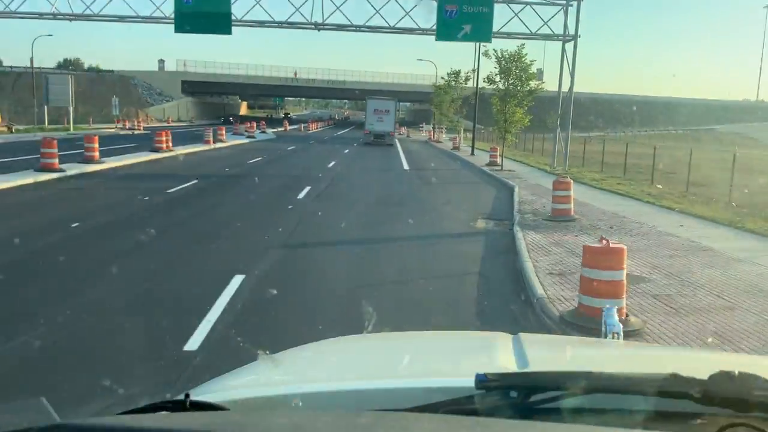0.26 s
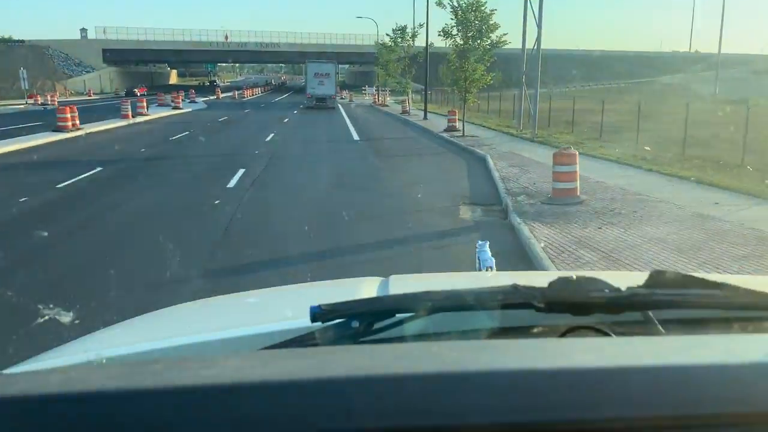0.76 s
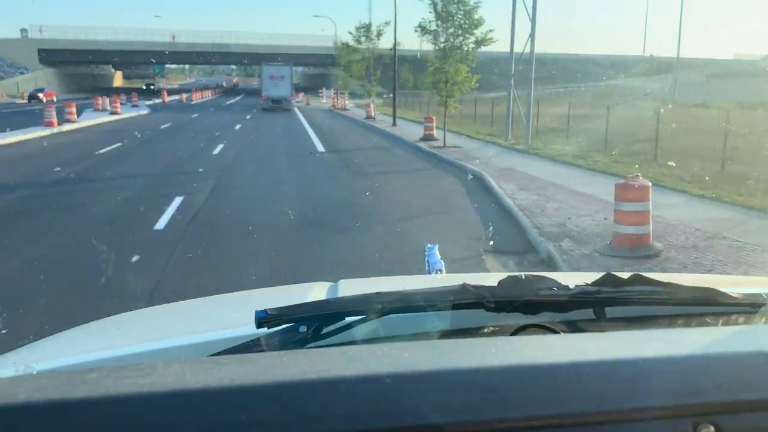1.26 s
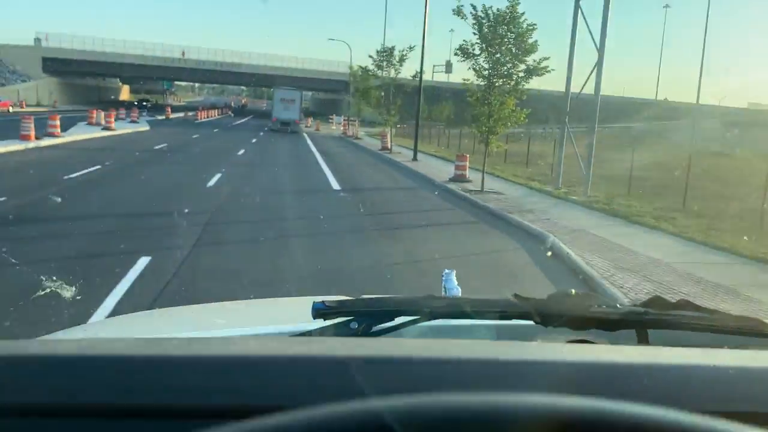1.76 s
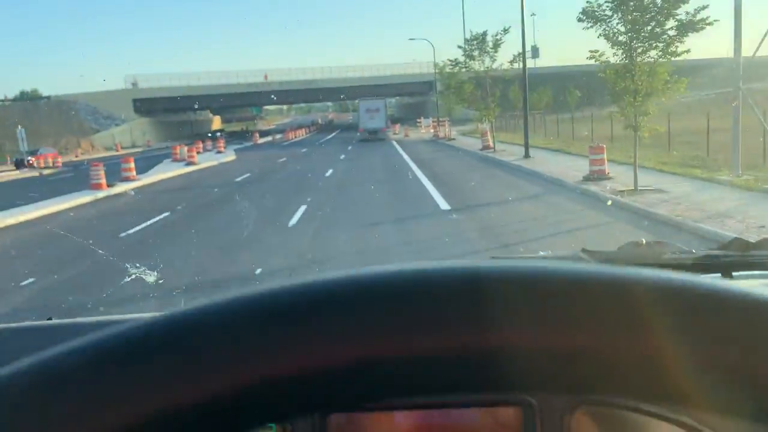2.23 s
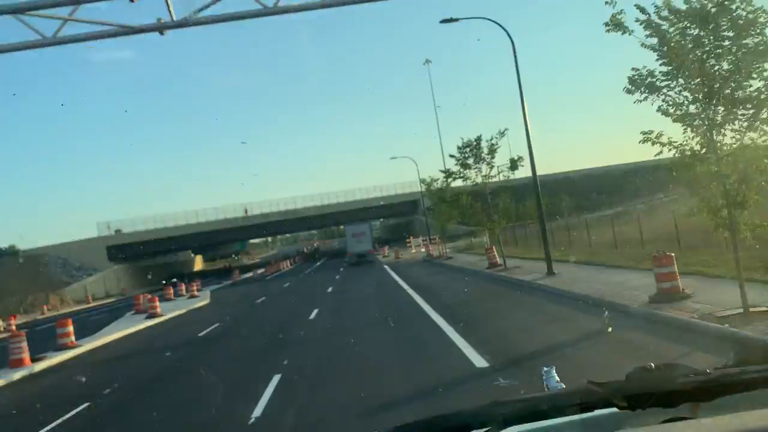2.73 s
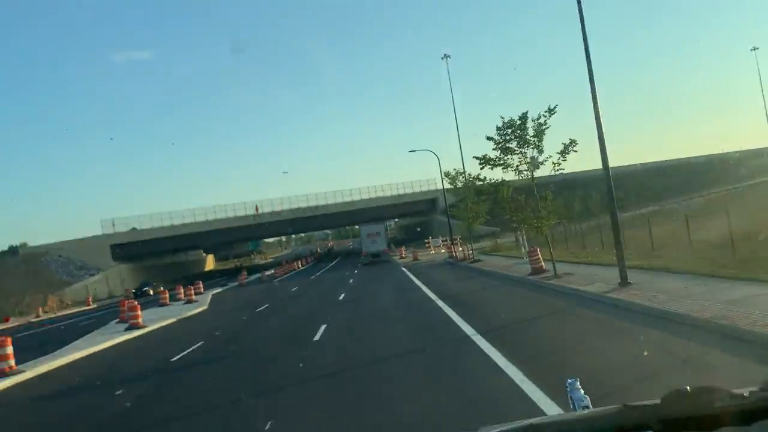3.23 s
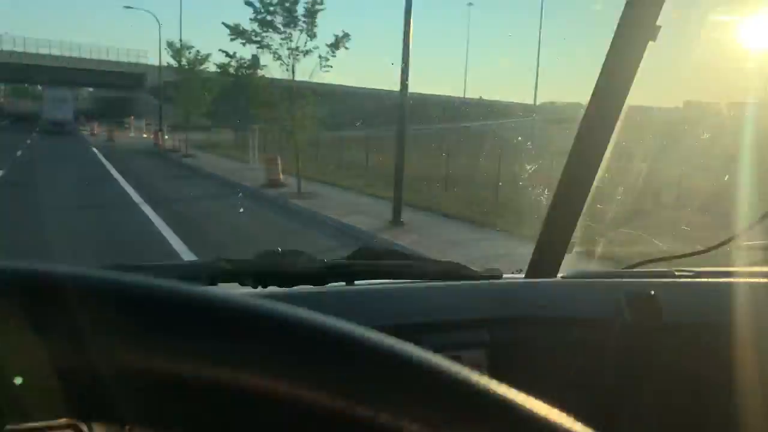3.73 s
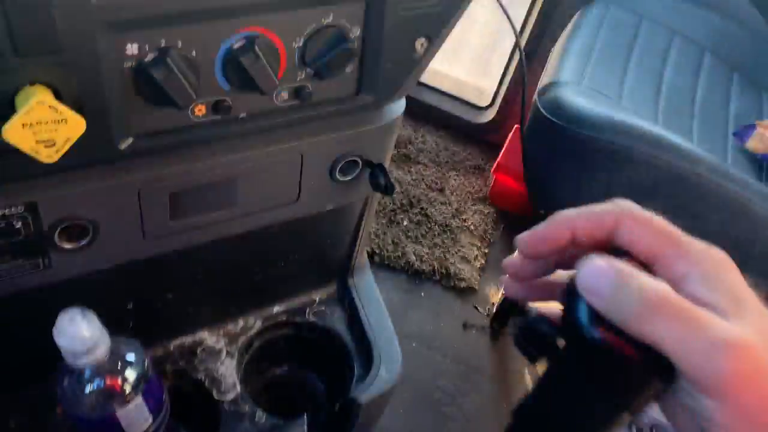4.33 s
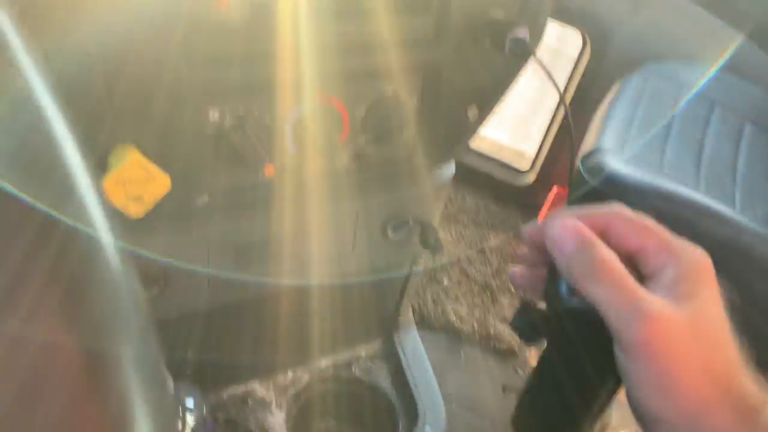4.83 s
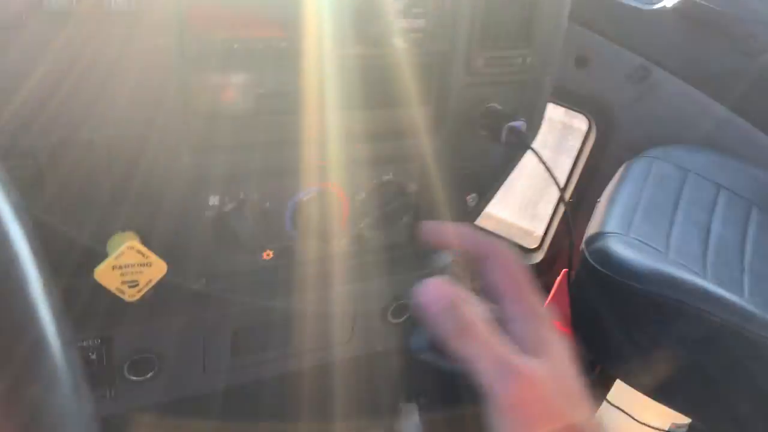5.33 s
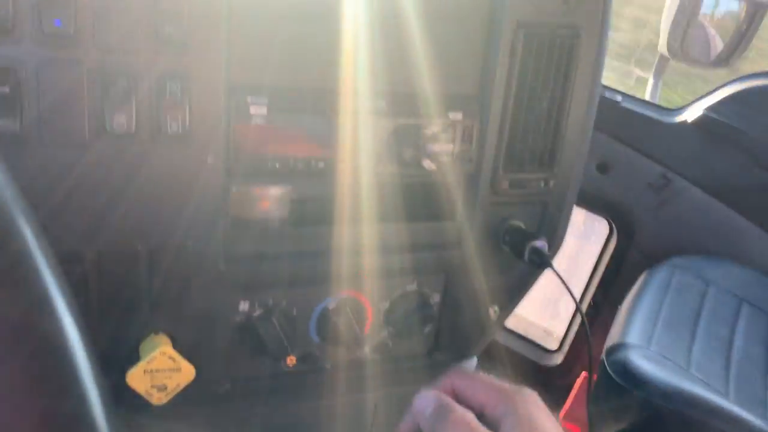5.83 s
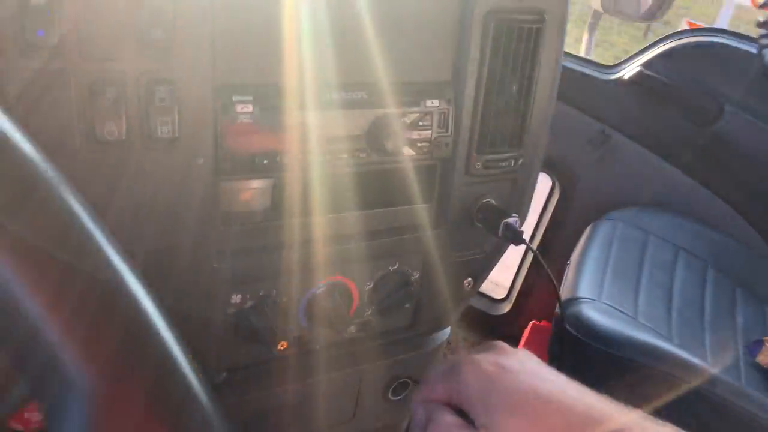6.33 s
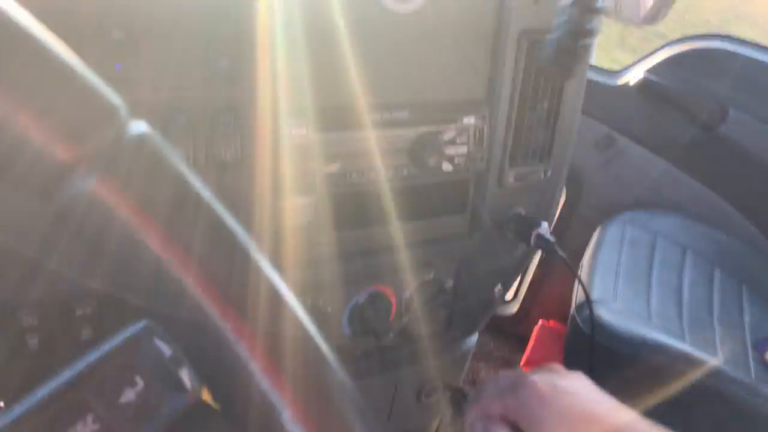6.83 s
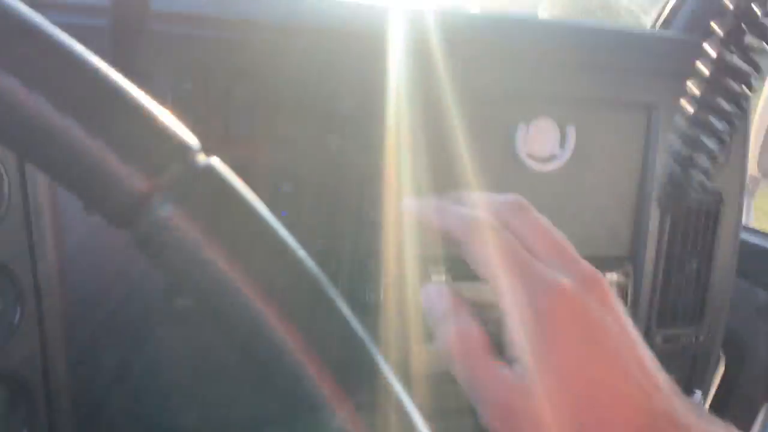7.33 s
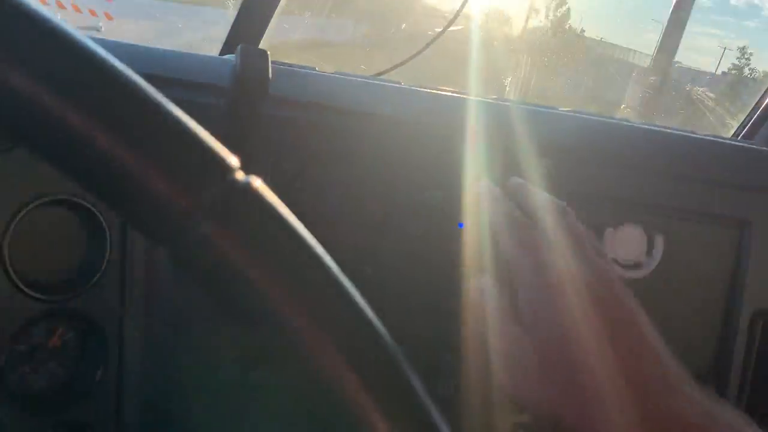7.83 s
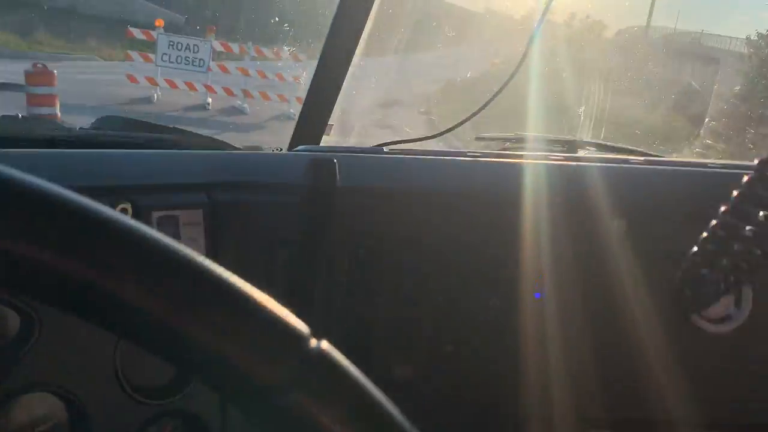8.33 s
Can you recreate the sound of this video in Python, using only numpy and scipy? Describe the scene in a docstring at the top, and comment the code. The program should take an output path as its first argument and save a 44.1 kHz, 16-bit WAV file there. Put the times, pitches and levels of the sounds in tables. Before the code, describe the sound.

A heavy diesel growls upward under load, sags at a shift and settles, amid cab roar, relay ticks, jingling keys and lever clicks.

```python
"""Diesel truck cab through a gear change

A six-cylinder engine, a sum of sine orders, pulls up through its revs, drops for a gear change and
cruises on amid roar of filtered noise and a buzzing panel. At first an indicator relay ticks: noisy
contacts ring its housing. Keys ring as metal modes, switches and trim click as noise bursts, the turbo
whistles as a gliding sine under load, and a faint squeak is a brief rough sine. Halfway the hand-held
microphone swings from the windscreen down to the gear lever."""
import sys
import numpy as np
from scipy import signal
from scipy.fft import rfft, irfft, next_fast_len
from scipy.io import wavfile

SR = 44100
rng = np.random.default_rng(int(sys.argv[2]) if len(sys.argv) > 2 else 0)


def to_wav(s):
    """Save 16-bit WAV."""
    ch = np.atleast_2d(s).T  # columns
    pcm = np.round(np.clip(ch, -1, 1) * 32767)  # PCM
    wavfile.write(sys.argv[1], SR, pcm.astype(np.int16))


N = 377936  # length in samples


def from_db(db):
    """Logarithmic level: 20 dB is a tenfold amplitude."""
    return 10 ** (np.asarray(db) / 20)


def rms_one(x):
    """Normalisation to unit root mean square."""
    return x / np.sqrt(np.mean(x ** 2) + 1e-20)


def in_time(rows, step=1):
    """Linear interpolation of a table's columns at every step-th sample."""
    times_s, *columns = np.transpose(rows)
    return [np.interp(np.arange(0, N, step) / SR, times_s, column) for column in columns]


def at_hz(points, hz):
    """Spectral envelope: linear interpolation on a logarithmic frequency axis."""
    point_hz, values = np.transpose(points)
    return np.interp(np.log(np.maximum(hz, 1)), np.log(point_hz), values)


def drift(rate_hz, step=1):
    """Slow random modulation of rms 1: Gaussian points joined by straight lines."""
    s = np.arange(0, N, step) / SR
    size = int(N / SR * rate_hz) + 2
    # joining by lines lowers the variance to two thirds
    return np.interp(s * rate_hz, np.arange(size), rng.standard_normal(size)) * np.sqrt(1.5)


def ring(excitation, hz, t60):
    """Damped resonator: a unit impulse sets off a decaying sine of initial height 1."""
    radius, angle = from_db(-60 / (t60 * SR)), 2 * np.pi * hz / SR
    feedback = [1, -2 * radius * np.cos(angle), radius * radius]
    return signal.lfilter([0, np.sin(angle)], feedback, excitation + 1e-18)


def chatter(times_s, gains, length_s):
    """Contact noise: at each time a short scrabble swells fast and dies."""
    size = round(length_s * SR)
    u = np.arange(size) / size
    shape = rms_one(u * (1 - u) ** 2) / np.sqrt(size)  # unit energy
    out = np.zeros(N + size)
    for at_s, gain in zip(times_s, gains):
        out[int(at_s * SR):][:size] += gain * shape * rng.standard_normal(size)
    return out[:N]


def turned(step=1):
    """Receiver orientation: 0 facing the windscreen, 1 once the microphone faces the floor."""
    middle_s, length_s = 3.81, 0.37
    return np.clip((np.arange(0, N, step) / SR - middle_s) / length_s + .5, 0, 1)


def engine():
    """Harmonic synthesis: sines at orders of the four-stroke cycle; cab resonances lift the lesser ones."""
    # crankshaft motion: t/s, four-stroke cycle rate f/Hz
    speed = [(0.0, 10.3), (0.22, 10.5), (1.12, 11.55), (1.72, 12.3), (2.02, 13.06), (2.32, 13.53),
             (2.62, 14.28), (3.22, 15.26), (3.82, 16.25), (4.42, 16.82), (4.6, 16.8), (4.9, 15.62),
             (5.2, 13.74), (5.5, 12.58), (5.8, 12.3), (6.1, 12.72), (6.81, 12.66), (7.11, 12.85),
             (8.01, 12.39), (8.57, 11.98)]
    # drive: t/s, firing tone level/dB, load level/dB for the orders without a curve of their own
    drive = [(0.05, -26, -21.5), (.6, -38, -19.5), (1.0, -25.5, -18.5), (1.4, -20.5, -16.5),
             (1.8, -13.5, -26), (2.15, -17.5, -13), (2.4, -31, -14.5), (2.6, -18.5, -15), (3.0, -20, -12.5),
             (3.25, -25, -14.5), (3.6, -14.5, -16), (4.2, -17.5, -14.5), (4.5, -20, -14.5),
             (5.35, -16.5, -20.5), (5.6, -37, -20), (6.0, -25.5, -20), (6.25, -21.5, -19.5),
             (6.6, -19.5, -19), (7.0, -23, -20), (7.2, -20.5, -21.5), (7.5, -28, -19), (8.2, -21, -24),
             (8.55, -24, -22.5)]
    # combustion knock, lifting orders above 20 without a curve of their own: t/s, level/dB
    knock = [(0, 3), (.4, 7.5), (1.4, 0), (2.5, 1), (3.0, 0.5), (3.8, 1), (4.4, -14), (4.9, 1), (5.9, 0.5),
             (6.45, 0.5), (7.0, -2), (7.4, -4), (8.57, -7)]
    # strong low orders beside the firing tone: order numbers; then t/s, level/dB of each
    low_orders = [5, 7.5, 9, 12]
    low_levels = [(0, -33, -29, -24, -24.5), (.5, -29.5, -24.5, -26.5, -29), (1, -27, -24.5, -27, -40),
                  (1.5, -23, -41, -22.5, -38), (2, -38, -38, -28.5, -25), (2.4, -30, -42, -22.5, -20),
                  (2.8, -23, -40, -20.5, -30), (3.2, -24, -42, -31, -28.5), (3.6, -18.5, -31, -27, -35),
                  (4, -26, -35, -24, -23.5), (4.4, -17, -47, -38, -22.5), (4.7, -24, -40, -47, -28),
                  (5.1, -32, -43, -44, -38), (5.6, -32, -47, -36, -40), (6, -28.5, -39, -48, -46),
                  (6.5, -27, -25, -27.5, -32), (7, -35, -34, -48, -34), (7.5, -25, -35, -34, -40),
                  (8.57, -26, -42, -32.5, -55)]
    # orders that swell at the top of the pull: order numbers; then t/s, level/dB of each
    pull_orders = [14, 15]
    pull_levels = [(0, -37, -43), (1, -35.5, -36), (2.1, -39, -30.5), (2.8, -30, -37), (3.6, -41, -42),
                   (4.0, -30.5, -31), (4.4, -21.5, -26.5), (4.75, -28, -29), (5, -43, -41), (6.5, -44, -41),
                   (8.57, -42, -47)]
    # whining orders that come and go: order numbers; then t/s, level/dB of each
    high_orders = [24, 28, 30, 36, 42, 48]
    high_levels = [(0, -62, -55, -59, -63, -40.5, -65), (0.3, -55, -61, -61, -52, -31, -36),
                   (0.7, -60, -53, -52, -42, -34.5, -43), (1, -41, -61, -63, -59, -37, -46),
                   (1.4, -44, -56, -54, -52, -44, -60), (1.699, -63, -58, -61, -39, -36.5, -53),
                   (2, -62, -47, -38, -32.5, -38, -46), (2.3, -50, -45, -56, -59, -57, -52),
                   (2.6, -52, -51, -41, -38, -62, -57), (3, -46, -56, -41, -57, -61, -63),
                   (3.4, -46, -43, -29.5, -38, -56, -53), (3.7, -33, -33, -38, -48, -52, -39.5),
                   (4, -46, -38.5, -49, -56, -64, -55), (4.3, -46, -35, -56, -56, -59, -70),
                   (4.6, -49, -62, -54, -43, -64, -56), (5, -58, -67, -59, -62, -69, -70),
                   (5.5, -58, -50, -41, -56, -58, -56), (6, -43, -43, -44.5, -53, -52, -64),
                   (6.5, -48, -49, -33.5, -46, -42, -49), (6.9, -64, -47, -47, -58, -41, -64),
                   (7.5, -50.5, -58, -49, -48, -59, -64), (8.5, -49, -61, -54, -56, -49, -61)]
    # unevenness between the cylinders: level/dB of orders 2, 3, 4 .. 50, unused where a curve exists
    unevenness = [-10.5, -3, -28, 0, 0, -3, 1, 0, 5.5, 2, 0, 5.5, 9, 6.5, -6.5, 7, 9, -0.5, 3.5, 1.5, -17,
                  -5, 4.5, -20, -3.5, -13.5, 1.5, -8, 3.5, -1.5, -23, -7.5, -10.5, -6.5, 3.5, -9, -19, 0.5,
                  -12, -4.5, 7.5, -8.5, -2, -10.5, -13, -13, 7.5, -2.5, -4.5]
    # cab air and panel resonances: f/Hz, width/Hz, level/dB facing windscreen, level/dB facing floor
    resonances = [(84.2, 77.5, 3, 4), (125.8, 13, 5.5, -10), (163.5, 18, 7, -4.5), (201.6, 20.4, 7.5, 4),
                  (242.5, 27.7, 0.5, 9.5), (283.6, 26.4, -7.5, 4.5), (389.6, 43, 3, 11.5),
                  (449.7, 43, 12, 5), (529, 58, 9.5, 11.5), (633, 29, 14, -0.5)]
    # the engine leans left as the microphone sways: t/s, left over right level/dB
    sway = [(0.0, 1), (2.0, 4.5), (4.72, -0.5), (4.89, 3), (5.01, 1.0), (6.73, 3.0), (7.76, 1.5), (8.31, 7),
            (8.57, 3)]
    cylinders, top_order = 6, 50  # the firing tone is the order equal to the number of cylinders
    tilt_db_per_octave = -7
    order_waver_db, tone_waver_db = 3.2, 1.0
    step = 8  # low tones are computed at an eighth of the rate

    cycle_hz, = in_time(speed, step)
    firing_db, load_db = in_time(drive, step)
    knock_db, = in_time(knock, step)
    curves = [firing_db] + in_time(low_levels, step) + in_time(pull_levels, step)
    curves += in_time(high_levels, step)
    own_db = dict(zip([cylinders] + low_orders + pull_orders + high_orders, curves))
    cycle_phase = 2 * np.pi * np.cumsum(cycle_hz) * step / SR
    down = turned(step)
    cab = [(hz, width, from_db(up_db + (down_db - up_db) * down))
           for hz, width, up_db, down_db in resonances]
    out = 0
    for order in sorted({*range(2, top_order + 1), *low_orders}):
        if order in own_db:
            gain = from_db(own_db[order] + tone_waver_db * drift(9, step))
        else:
            lift = sum(top / (1 + (2 * (order * cycle_hz - hz) / width) ** 4) for hz, width, top in cab)
            level_db = load_db - 19.5 + unevenness[int(order) - 2]
            level_db = level_db + tilt_db_per_octave * np.log2(order / cylinders)
            level_db = level_db + order_waver_db * drift(4.5, step) + knock_db * (order > 20)
            gain = (0.074 + lift) * from_db(level_db)
        # each order meets the two ports with a phase gap whose range grows with order
        gap = min(order / 25, 1) * rng.uniform(-.3, 1.7) * np.array([[-.5], [.5]])
        phase = order * cycle_phase + rng.uniform(0, 2 * np.pi) + 0.15 * drift(5.5, step) + gap
        out = out + np.sqrt(2) * gain * np.sin(phase)
    lean_db, = in_time(sway)
    return signal.resample_poly(out, step, 1, axis=1)[:, :N] * from_db([lean_db / 2, -lean_db / 2])


def roar():
    """Subtractive synthesis: stereo noise in overlapping bands, with levels for five ranges."""
    # common part of the two ports, before each range is set to its level: f/Hz, density level/dB
    common = [(20, -46.5), (45, -1), (85, 14.5), (130, 3), (200, -7), (330, -18.5), (480, -23),
              (700, -24.5), (1050, -26.5), (1500, -28.5), (2700, -38), (4200, -40.5), (7600, -47.5),
              (10200, -51.5), (12300, -56), (12900, -86), (16000, -75.5)]
    # left-right part over the common part: f/Hz, level/dB
    difference = [(20, -19), (100, -8.5), (300, -12), (600, -1), (2000, 1.5), (4500, 0), (7500, 0.5),
                  (8600, 5.5), (10200, -11), (11000, -11), (12000, -5), (13500, 33.5), (16000, -1)]
    # share of the left-right part due to earlier arrival on the right: f/Hz, share/1
    right_first = [(20, 0.3), (400, 0.02), (1000, 0.37), (2500, 1), (5000, 0), (16000, 0)]
    # balance of the ports: f/Hz, left over right level/dB
    balance = [(60, -4.5), (110, 6.5), (200, -3), (380, 1.5), (700, 1.5), (1290, 3), (2380, 1), (4400, -2),
               (8120, -2), (15000, 5)]
    # panels and trim that colour the roar: f/Hz, width/Hz, level/dB
    panel_modes = [(387.5, 30, 6), (473, 23, 6.5), (853, 43, 4.5), (1225, 90, 4.5), (1460, 41, -1),
                   (1815, 170, 2), (2400, 210, 3.5)]
    # range levels: t/s, growl level/dB, roar level/dB, hiss level/dB, rumble level/dB
    range_levels = [(0.0, -36, -32.5, -52.5, -25.5), (0.55, -34, -33.5, -50.5, -26),
                    (1.17, -32, -34, -51.5, -28), (2.36, -31, -30.5, -50, -26),
                    (2.77, -29.5, -35, -48, -19), (3.27, -31.5, -32, -47, -21.5),
                    (3.46, -27.5, -34, -48, -29), (3.84, -27.5, -31, -49.5, -22),
                    (4.46, -26, -31, -47.5, -38), (5.04, -31.5, -35.5, -52, -22),
                    (5.82, -36, -35, -55, -25), (6.04, -31, -34.5, -50.5, -32),
                    (6.15, -25.5, -35, -50, -25), (6.3, -31, -34, -49.5, -25.5),
                    (6.52, -26.5, -33.5, -50.5, -28), (6.8, -31.5, -32.5, -50.5, -29),
                    (6.93, -28, -36.5, -53, -26.5), (7.16, -33, -36, -56.5, -26),
                    (7.64, -32, -34, -49.5, -26), (7.9, -33, -37, -54.5, -28),
                    (8.57, -32.5, -34.5, -57, -26)]
    # topmost hiss: t/s, level/dB
    top_level = [(0.0, -65), (0.52, -59), (1.19, -62.5), (1.74, -62), (2.65, -55), (2.98, -57.5),
                 (4.56, -55), (4.99, -63), (5.11, -65), (5.7, -69), (6.18, -60.5), (6.54, -62),
                 (7.09, -66.5), (8.57, -66)]
    ripple_db, ripple_hz = 1.8, 45  # random unevenness of the roar's spectrum: depth and spacing
    swell_db, patch_db, patches_per_s = .7, 1.4, 10

    size = next_fast_len(N)
    hz = np.arange(size // 2 + 1) * SR / size
    one, other = rfft(rng.standard_normal((2, size)))
    share = np.clip(at_hz(right_first, hz), 0, 1)
    common_db = at_hz(common, hz)
    mid = one * from_db(common_db)
    # a quarter-cycle shift of the common part makes the left lag
    side = -1j * np.sqrt(share) * one + np.sqrt(1 - share) * other
    side = side * from_db(common_db + at_hz(difference, hz))
    lean = from_db(at_hz(balance, hz) / 2)
    panels = 1 + sum((from_db(db) - 1) / (1 + (2 * (hz - mode_hz) / width) ** 2)
                     for mode_hz, width, db in panel_modes)
    ripple = np.interp(hz / ripple_hz, np.arange(500), rng.standard_normal(500)) * (hz > 500)
    both = np.array([(mid + side) * lean, (mid - side) / lean]) * panels * from_db(ripple_db * ripple)

    growl_db, roar_db, hiss_db, rumble_db = in_time(range_levels)
    top_db, = in_time(top_level)
    # each range: level, upper edges of its bands in Hz
    ranges = [(rumble_db, [220]), (growl_db, [330, 423, 564, 709]), (roar_db, [1060, 1480, 2200, 3800]),
              (hiss_db, [8700]), (top_db, [SR])]
    out, below = 0, 0
    for level_db, edges in ranges:
        whole, patched = 0, 0
        for edge in edges:
            upto = 1 / (1 + (hz / edge) ** (4 if edge < 8000 else 30))
            band = irfft(both * (upto - below), size)[:, :N]
            whole, below = whole + band, upto
            # the bands of a divided range swell independently
            patched = patched + band * from_db(patch_db * drift(patches_per_s) * (len(edges) > 1))
        out = out + from_db(level_db + swell_db * drift(12.0)) * patched / np.std(whole)
    return out


def buzz():
    """Randomly driven resonance: shaking rings a loose panel; another mode takes over in the turn."""
    # loose panel: t/s, level/dB
    panel_level = [(0, -46), (.6, -37.5), (1.4, -41), (1.9, -42), (2.4, -41), (3, -50), (4.5, -47),
                   (5.2, -55), (6.4, -48), (7.5, -49), (8.57, -55)]
    up_hz, down_hz, t60_s = 1270, 1220, 0.021  # facing the windscreen, facing the floor
    flutter_db = 4
    shaking = rng.standard_normal((2, N)) * from_db(flutter_db * drift(40))
    up, down = (rms_one(ring(shaking, hz, t60_s)) for hz in (up_hz, down_hz))
    return from_db(in_time(panel_level)[0]) * (up + (down - up) * turned())


def relay():
    """Impact excitation of modes: the armature scrabbles, rebounds on closing and leaves a buzz."""
    # ticks, opening and closing in turn: t/s, relative level/dB, left over right level/dB,
    # extra level/dB of the modes under 2 kHz
    ticks = [(0.051, -13, -2, -7), (0.4536, -17, -1, 0), (0.831, -17, 3, 4.5), (1.233, -13.5, 1.5, 4.5),
             (1.589, -16.5, 5, 4.5), (1.9871, -13.5, 1, 4.5), (2.366, -14.5, -2, 0),
             (2.7687, -11, -0.5, -2), (3.1108, -12, 0.5, 1)]
    # housing modes: f/Hz, level/dB on opening, level/dB on closing, t60/s
    housing_modes = [(1230, -12, -16, .03), (1840, -5, -16, .03), (1920, -3, -11, .04),
                     (2350, -14, -9, .03), (2800, -13, -6, .035), (2960, -13, -1, .045),
                     (3070, -13, -2, .035), (3230, -14, -2, .045), (3410, -14, -4, .04),
                     (3600, -12, -2, .05), (3740, -9, -6, .04), (3830, -5, -5, .065), (4150, -9, -7, .035),
                     (4350, -11, -10, .025), (4800, -18, -15, .02)]
    # rebounds of the armature on closing: delay t/s, level/dB
    bounces = [(0.012, -9), (0.022, -9), (.035, -13), (.05, -17)]
    dash_loss_db = -3
    scrabble_s, blow_s = .012, .003
    tail_db, tail_s = -9, .05  # the dash buzzes on after each tick

    times_s, peak_db, pan_db, low_db = np.transpose(ticks)
    closing = np.arange(len(times_s)) % 2
    blow_samples = np.arange(round(blow_s * SR))
    window = np.hanning(len(blow_samples)) * 4 / len(blow_samples)
    out = np.zeros((2, N))
    for hz, open_db, close_db, t60 in housing_modes:
        level_db = peak_db + dash_loss_db + np.where(closing, close_db, open_db)
        level_db = level_db + low_db * (hz < 2000)
        # amid the scrabble one firm blow, softened over its length
        blow = np.zeros(N)
        blow[((times_s + blow_s) * SR).astype(int)] = from_db(level_db) * rng.choice([-1, 1], len(times_s))
        blow = np.convolve(blow, np.cos(2 * np.pi * hz * blow_samples / SR) * window)[:N]
        # the middle modes take the blow in opposite phase at the two ports
        for port, sign in zip(out, (1, 1 if hz < 2000 or hz > 3700 else -1)):
            contacts = sign * blow + chatter(times_s, from_db(level_db + 0.5), scrabble_s)
            contacts += chatter(times_s, from_db(level_db + tail_db), tail_s)
            for later_s, db in bounces:
                contacts += chatter(times_s[1::2] + later_s, from_db(level_db[1::2] + db), scrabble_s / 2)
            port += ring(contacts, hz, t60)
    lean_db = np.interp(np.arange(N) / SR, times_s + 0.039, pan_db) / 2
    housing = signal.butter(3, [1000, 5000], "band", fs=SR, output="sos")
    return signal.sosfilt(housing, out) * from_db([lean_db, -lean_db])


def keys():
    """Modal synthesis: soft contacts ring thin metal and excite only each mode's neighbourhood."""
    # touches: t/s, relative level/dB, extra level/dB of the lowest mode
    touch_table = [(0.385, -52, -15), (0.7294, -51, -14), (2.6294, -40, -10), (2.6988, -43, -4),
                   (3.1133, -45, 0), (3.3557, -43, 5), (3.5513, -37, 4), (3.768, -37, -8),
                   (3.8167, -35, -9), (3.93, -31, -2), (3.9958, -39, -4), (4.1694, -39.5, 1.5),
                   (4.2448, -39.5, -7), (4.36, -36.5, 2), (4.579, -36, 0), (4.632, -34, -7),
                   (4.7262, -34, -4.5), (5.009, -43, 4), (5.0963, -40, -2), (5.4101, -43, 5),
                   (5.5024, -38, 2), (5.7997, -45, -6), (5.8661, -42, -9), (6.542, -40, -15),
                   (6.6433, -35, -13), (7.0364, -44, -5), (7.0733, -37, -10), (7.3, -44, -17),
                   (7.3652, -38, 3), (7.4639, -36, -10), (7.8486, -41, -13), (8.2347, -42, -13)]
    # metal modes, lowest first: f/Hz, level/dB, t60/s
    metal_modes = [(7180, -2, .1), (13680, -19, .07), (14830, -4, .12), (14960, -6, .1)]
    times_s, peak_db, low_db = np.transpose(touch_table)
    out = 0
    for index, (hz, mode_db, t60) in enumerate(metal_modes):
        level_db = peak_db + mode_db + (low_db if index == 0 else 0)
        touches = chatter(times_s, from_db(level_db), 0.0046)
        near = signal.butter(2, [hz - 200, hz + 200], "band", fs=SR, output="sos")
        out = out + signal.sosfilt(near, ring(touches, hz, t60))
    return out * from_db([[-.5], [.5]])


def clicks():
    """Transient noise with a sharp crack, a coloured tail and a narrow note that swells a little later."""
    # switches, lever and trim: t/s, relative level/dB, treble tilt/dB per octave,
    # narrow note level/dB, narrow note f/Hz (from low knock to high puff), rise t/s, t60/s
    click_table = [(.699, -20.5, -2, -2, 2040, .0005, 0.12), (.729, -35, 10, -9, 1990, .001, 0.25),
                   (0.859, -31, 1, -12, 1900, .001, 0.13), (1.778, -34, 4, -7, 2000, .004, 0.19),
                   (2.066, -14.5, -7.5, 4.5, 1230, .001, 0.076), (2.304, -30, -14, 12, 1200, .002, 0.2),
                   (2.462, -23, 7, 3, 1900, .001, 0.089), (2.476, -40, 4, -6, 1900, .001, .1),
                   (2.752, -17.5, -2.5, -17, 1930, .001, 0.082), (2.854, -20, -2.5, -18, 1960, .001, 0.11),
                   (3.173, -23.5, 2, -3, 2340, 0.00092, 0.082), (3.197, -26, 5, -3, 11300, .001, 0.063),
                   (3.211, -9, 0.5, -7, 2310, 0.0031, 0.15), (4.655, -13.5, -7, -15, 1700, 0.0033, 0.19),
                   (5.045, -23, -4, -2.5, 1720, 0.0037, 0.21), (5.425, -17.5, -6, -12, 1270, .006, 0.3),
                   (5.796, -12.5, -5.5, -13.5, 1720, 0.0052, 0.21), (6.59, -16, -7, -17, 1760, 0.0057, 0.3),
                   (6.672, -36, 4, -5, 11200, .008, 0.14), (7.095, -30, 0, -6, 10600, 0.029, 0.25),
                   (7.391, -22.5, -2.5, -12, 2400, .002, 0.16), (7.626, -19, 10, -14, 3950, .001, 0.15),
                   (7.7053, -8, 1, -5.5, 2056, 0.00018, 0.16), (7.789, -17, -7, -7, 2400, .001, 0.11),
                   (8.151, -11, -5, -12, 1820, 0.0023, 0.16), (8.336, -20, -5.5, -12, 1800, .003, 0.13)]
    # common colour before normalisation: f/Hz, density level/dB
    click_colour = [(400, -12), (900, -10.5), (1500, -11.5), (3800, -6.5), (4400, -23.5), (5000, -11.5),
                    (6300, -9.5), (7900, -13.5), (10300, -13), (12800, -22), (14800, -17), (16400, -45)]
    # crack over the tail of a click at 0 dB; the harder the click, the sharper
    crack_db, crack_per_db, crack_t60_s = 24, 1.4, .005
    crack_hz, crack_width_hz, crack_ring_db = 10300, 1500, 20  # the crack rings high
    note_sharpness = 7  # pitch over width
    note_decay_share = .6  # of the click's t60
    note_rough = .9  # narrow noise over the clear tone

    size = 16384
    out = np.zeros((2, N + size))
    hz, s = np.arange(size // 2 + 1) * SR / size, np.arange(size) / SR
    ringing = 1 + from_db(crack_ring_db) / (1 + (2 * (hz - crack_hz) / crack_width_hz) ** 2)
    for at_s, peak_db, tilt_db, note_db, note_hz, rise_s, t60 in click_table:
        one, other = rng.standard_normal((2, size))
        white = rfft([one + 0.95 * other, one - 0.89 * other])
        colour = from_db(at_hz(click_colour, hz) + tilt_db * np.log2(np.maximum(hz, 500) / 5000))
        tail = from_db(-60 * s / t60)
        crack = from_db(crack_db + crack_per_db * peak_db - 60 * s / crack_t60_s)
        sound = tail * rms_one(irfft(white * colour, size))
        sound += crack * rms_one(irfft(white * colour * ringing, size))
        sound = sound / 2
        narrow = 1 / np.sqrt(1 + (2 * note_sharpness * (hz / note_hz - 1)) ** 4)
        note = np.sin(2 * np.pi * note_hz * s + rng.uniform(0, 2 * np.pi, (2, 1)))
        note = note + note_rough * rms_one(irfft(white * narrow, size))
        note_swell = tail ** (1 / note_decay_share) * (1 - np.exp(-s / 0.0042))
        sound += from_db(note_db) * note_swell * note
        out[:, round(at_s * SR):][:, :size] += from_db(peak_db - 5.0) * sound * np.clip(s / rise_s, 0, 1)
    return out[:, :N]


def turbo():
    """Amplitude modulation: fast random gain makes a sine a breathy whistle, louder as it rises."""
    # whistle: t/s, f/Hz
    whistle = [(1.7, 9340), (1.8, 10200), (2.25, 11200), (2.55, 11800), (2.85, 11750), (3.3, 11750),
               (4.0, 11600), (4.57, 11200), (4.75, 10600), (5.1, 9800)]
    top_hz, top_db, db_per_octave = 11800, -54, 31  # nominal level at the top pitch, before the random gain
    hz, = in_time(whistle)
    level_db = top_db + db_per_octave * np.log2(hz / top_hz)
    s = np.arange(N) / SR
    on = (s > whistle[0][0]) & (s < whistle[-1][0])
    tone = np.sin(2 * np.pi * np.cumsum(hz) / SR + np.array([[0], [1.5]]))  # phase differs by port
    return on * from_db(level_db) * (.3 + drift(330)) * tone


def squeak():
    """Modulated pure tone: a brief sine swells and fades, slightly rough from random gain."""
    start_s, length_s, hz, level_db = 5.635, 0.069, 3770, -53
    s = np.arange(N) / SR
    swell = np.sin(np.pi * np.clip((s - start_s) / length_s, 0, 1))
    return from_db(level_db + 5 * drift(130)) * swell * np.sin(2 * np.pi * hz * s)


def cab_echo(x):
    """Convolution with dense early reflections from glass and panels, other ones for each port."""
    t60_s, echo_db = .12, -3
    s = np.arange(SR // 5) / SR
    tail = rng.standard_normal((2, len(s))) * from_db(-60 * s / t60_s) * np.clip(s / 0.0043, 0, 1)
    tail = tail / np.sqrt(np.sum(tail ** 2, axis=1, keepdims=True))
    return x + from_db(echo_db) * signal.fftconvolve(x, tail, axes=1)[:, :N]


def scene():
    """Superposition of all sources in the cab."""
    return engine() + roar() + buzz() + relay() + cab_echo(keys() + squeak()) + clicks() + turbo()


def record(dry):
    """Mid-side filtering: the sum of left and right dips in the treble; a low-pass cuts the top."""
    # dips in the treble of the sum of left and right: lower f/Hz, upper f/Hz
    dips = [(8000, 9400), (13200, 13600)]
    cutoff_hz = 16400
    mid, side = (dry[0] + dry[1]) / 2, (dry[0] - dry[1]) / 2
    for dip in dips:
        mid = signal.sosfilt(signal.butter(3, dip, "bandstop", fs=SR, output="sos"), mid)
    low_pass = signal.cheby2(12, 70, cutoff_hz, fs=SR, output="sos")
    return signal.sosfilt(low_pass, [mid + side, mid - side])


dry = scene()
out = record(dry)
to_wav(out)
```